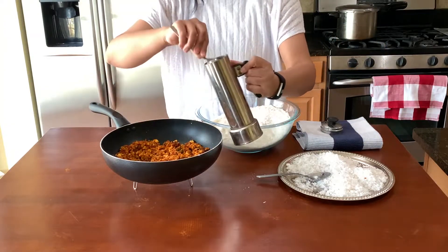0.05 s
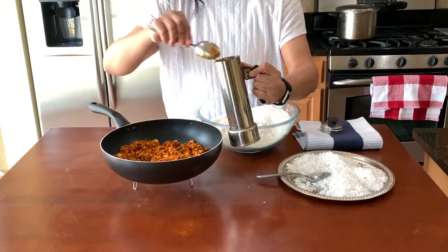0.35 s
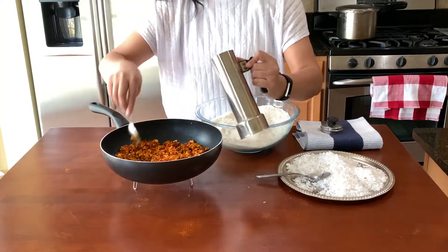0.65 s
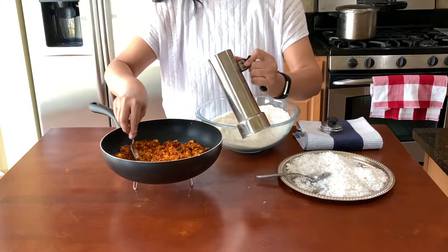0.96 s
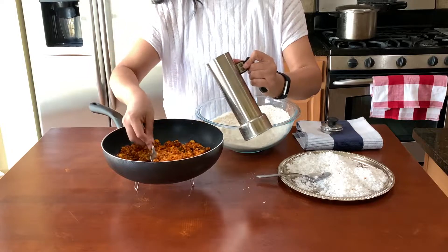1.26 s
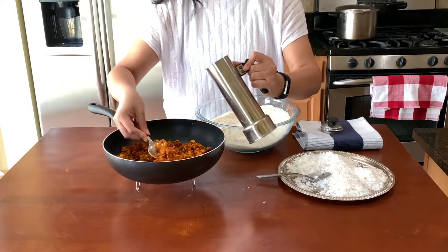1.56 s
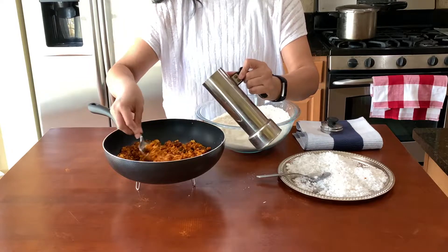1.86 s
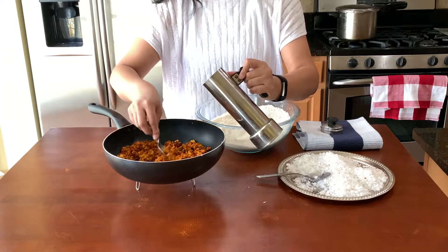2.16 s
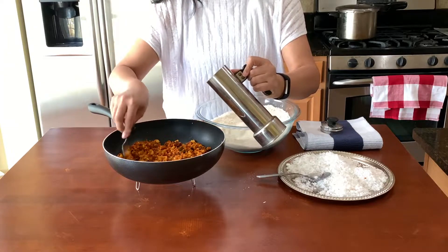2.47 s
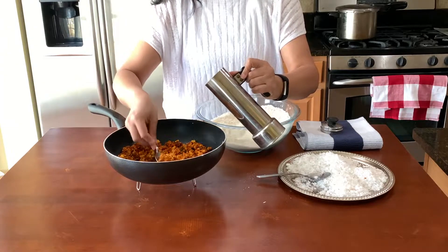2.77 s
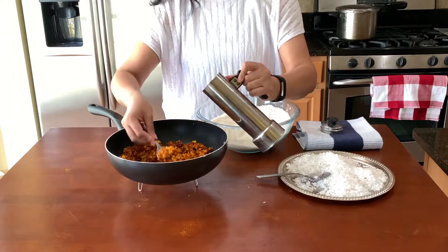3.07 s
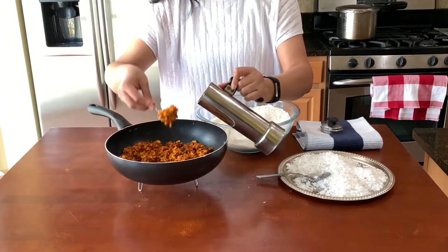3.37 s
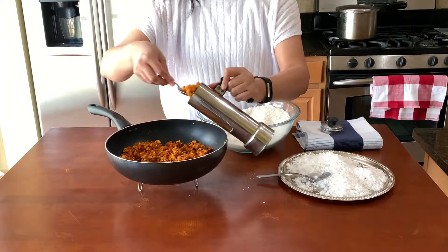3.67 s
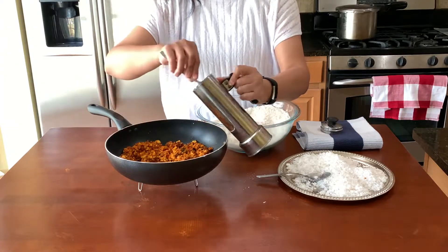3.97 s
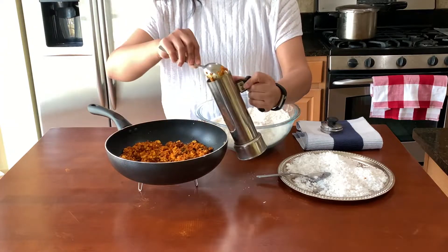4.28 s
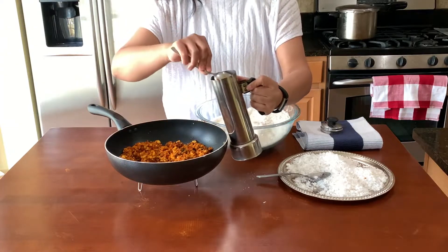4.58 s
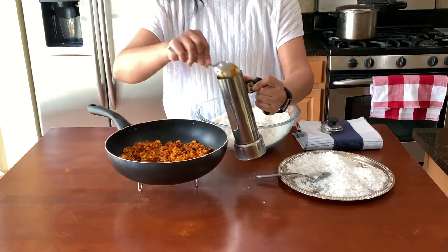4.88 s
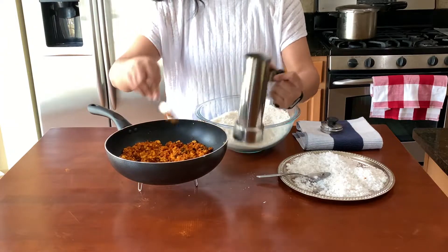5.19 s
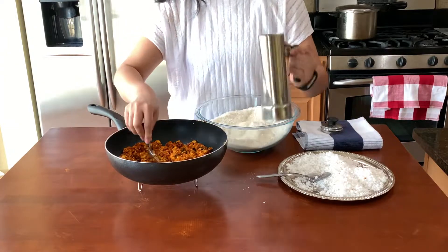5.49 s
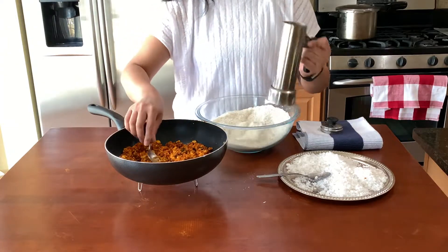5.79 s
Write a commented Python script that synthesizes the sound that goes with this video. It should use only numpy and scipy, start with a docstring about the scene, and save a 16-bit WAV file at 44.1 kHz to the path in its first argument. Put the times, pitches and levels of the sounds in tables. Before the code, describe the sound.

A steel spoon clinks lightly on a steel tube, then knocks and briefly scrapes in a frying pan, scooping moist filling with faint sticky crackles. After a pan knock that thumps the wooden table, a quick run of sharp clinks and a tiny squeal come from the tube's rim. One more loud pan knock follows. The sounds are near, in a small, hard-walled kitchen with a low rumble and faint hiss.

```python
"""Spoon, steel tube and frying pan

A steel spoon scoops moist filling from a frying pan and knocks it off into a hand-held steel tube. It clinks
and squeals on the tube's rim, knocks and scrapes in the pan, and the food crackles softly. Once the tube's base
knocks against the pan. Hard blows thump the table. A small hard kitchen rings after each, over a low rumble and
a faint hiss."""
import sys
import numpy as np
from scipy import signal
from scipy.fft import rfft, irfft
from scipy.io import wavfile

SR = 44100
rng = np.random.default_rng(int(sys.argv[2]) if len(sys.argv) > 2 else 0)


def digitize_waveform(pressure):
    """Quantize a signal to 16-bit integers and store it at the path in sys.argv[1].

    Rows of a 2-D input are taken as channels; values are limited to [-1, 1].
    """
    field = np.atleast_2d(pressure).T
    bounded = np.clip(field, -1, 1)
    quanta = np.round(bounded * 32767).astype(np.int16)
    wavfile.write(sys.argv[1], SR, quanta)


N = 266364
T = np.arange(N) / SR
RING_T = T[:SR]

# Each row: start in seconds, level in dB, thud below 950 Hz in dB, brightness above 4200 Hz in dB,
# pitch favoured by the struck spot in Hz, its lift in dB, spoon ring relative to the vessel in dB.
RIM_CLINKS = [(.3595, -22.5, 8.5, 4, 604, 2.5, -6.5), (3.8108, -25.5, 2.5, -2, 885, 8, -10),
              (4.6630, -10, -15.5, -0.5, 1635, 15.5, -11.5), (4.7260, -29, 8, 4.5, 9300, 8, -15),
              (4.8188, 0.5, -9, -4.5, 1950, 7, -30.5), (4.8272, -18.5, -7, 1.5, 2760, 12, -19),
              (4.9158, -17, -10.5, 4, 3040, 9.5, -20)]
# Each row: frequency in Hz, relative energy in dB, t60 in seconds.
TUBE_MODES = [(461.3, -7, 0.017), (621, -5.5, 0.052), (881, -11.5, 0.051), (1056, -8.5, 0.085),
              (1364, -7.5, 0.027), (1748, -13, 0.049), (1805, -2, 0.025), (1823, -15, 0.33),
              (1980, -16, .06), (2420, -11, 0.03), (2604, -6.5, 0.049), (2750, -3, 0.041),
              (3084, -18.5, 0.13), (3890, -8, 0.056), (4040, -23, 0.081), (5150, -19.5, 0.07),
              (4920, -17, 0.068), (6930, -12, 0.027), (6560, -30.5, 0.16), (7340, -28.5, 0.095),
              (9100, -23.5, 0.03)]
# Spectrum of the many short-lived overtones. Each row: frequency in Hz, relative density in dB.
TUBE_CRACK = [(100, -38), (250, -11), (500, 1.5), (1500, -2.5), (3000, -5.5), (5500, -13.5), (9500, -8.5),
              (14000, -18.5), (17000, -31.5)]


def tube_clinks():
    """The spoon strikes the rim of the hand-damped steel tube; returns (rings, cracks)."""
    return undb(6.5) * blows(RIM_CLINKS, TUBE_MODES, TUBE_CRACK, crack_db=-3.5, crack_t60=0.02,
                             tick_db=-16.5, linger_db=-14.5, linger_t60=0.27)


# Columns as in RIM_CLINKS, TUBE_MODES and TUBE_CRACK, in that order.
PAN_KNOCKS = [(.9868, -26.5, 8, -17, 1880, 9, -30), (1.1270, -14.5, -6.5, -5, 1100, 8, -30),
              (1.186, -21, 1, -24, 1020, 20, -33), (1.5174, -47.5, -17, 8, 4760, 17, -10),
              (2.6272, -5.5, -6.5, -7.5, 3270, 6.2, -16), (3.0600, -17, -5.5, -16, 2430, 5.1, -11.5),
              (4.5258, -12, 6, -1, 809.3, 10, -23), (5.6160, -39.5, 10, 6, 1105, 3, -22.5),
              (5.6442, 1, -4.5, -2, 1210, 5.2, -27.5)]
PAN_MODES = [(157, -1.5, 0.37), (229.7, 6.5, 0.35), (291.5, -2, .2), (381, -4, 0.17), (440, -9, 0.54),
             (644, -0.5, 0.43), (790, -10, 0.39), (986, -4.5, 0.51), (1189, 1, 0.041), (1274, -2, 0.2),
             (1515, -7, 0.33), (1820, -8, 0.31), (2080, -7, 0.2), (2190, -9, 0.32), (2525, -18, 0.45),
             (2625, -17.5, 0.1), (2960, -7, 0.18), (3357, -6, 0.2), (3650, -5.5, 0.07), (4080, -9, 0.22),
             (4640, -10.5, 0.12), (6920, -16.5, .12), (8100, -17.5, .14), (9200, -31, .1)]
PAN_CRACK = [(60, 16), (200, 11), (1200, 6), (3500, -0.5), (5500, -7.5), (9000, -10), (12000, -38),
             (16000, -38)]


def pan_knocks():
    """The spoon, or once the tube's base, knocks the frying pan, which rings lower and longer; returns (rings,
    cracks)."""
    return undb(0.5) * blows(PAN_KNOCKS, PAN_MODES, PAN_CRACK, crack_db=-1, crack_t60=0.051,
                             tick_db=-16, linger_db=-2, linger_t60=0.37)


# Each row: frequency in Hz, relative energy in dB, t60 in seconds.
SPOON_MODES = [(858, -0.5, 0.14), (1327, 0, 0.069), (2558, 6.5, 0.28), (3200, -8, 0.052), (3957, -6, 0.45),
               (6925, -4.5, 0.21), (9940, -10.5, .15), (11100, -14, 0.15)]


def blows(hits, modes, crack_spectrum, crack_db, crack_t60, tick_db, linger_db, linger_t60):
    """Each blow rings both vessel and spoon and gives a short crack with a hard tick."""
    rings, cracks = np.zeros((2, N))
    for start, db, *touch, spoon_db in hits:
        vessel = chime(modes, linger_db, linger_t60)
        spoon = chime(SPOON_MODES, linger_db, linger_t60)
        crack = unit(colour(rng.standard_normal(SR), crack_spectrum) * fade(crack_t60))
        tick = unit(np.diff(colour(rng.standard_normal(SR + 1), crack_spectrum)) * fade(.011))
        add(rings, start, undb(db) * contact(unit(vessel + undb(spoon_db) * spoon), *touch))
        add(cracks, start, undb(db) * contact(undb(crack_db) * crack + undb(tick_db) * tick, *touch))
    return np.array([rings, cracks])


def chime(modes, linger_db, linger_t60):
    """Struck metal is soon damped, but the walls keep its pitch a while longer."""
    t = RING_T[:SR // 2]
    knots_s = np.arange(0, .55, 1 / 55)
    linger = undb(linger_db) * unit(fade(linger_t60))[:len(t)]
    ring = np.zeros(SR)
    for k, (hz, db, t60) in enumerate(modes):
        phase = 2 * np.pi * hz * t
        direct = unit(fade(t60)[:len(t)]) * np.sin(phase)
        # Echoes from many walls waver in level and phase.
        waver, drift = rng.standard_normal((2, len(knots_s)))
        echo = np.interp(t, knots_s, undb(3 * waver)) * np.cos(phase + np.interp(t, knots_s, .9 * drift))
        ring[:len(t)] += (-1) ** k * undb(db + rng.standard_normal()) * (direct + linger * echo)
    return unit(ring)


def contact(x, thud_db, bright_db, spot_hz, spot_db):
    """The weight, hardness and spot of a blow filter its sound."""
    hz = bins(x)
    db = thud_db / (1 + (hz / 950) ** 4) + bright_db / (1 + (4200 / hz) ** 4)
    db += spot_db * np.exp(-.5 * (np.log2(hz / spot_hz) / .16) ** 2)
    # Minimum phase: nothing sounds ahead of the blow.
    cepstrum = irfft(np.log(undb(db)), len(x))
    cepstrum[1:len(x) // 2] *= 2
    cepstrum[len(x) // 2 + 1:] = 0
    return irfft(rfft(x) * np.exp(rfft(cepstrum)), len(x))


def rim_slide():
    """The spoon squeals up in pitch as it slides on the rim; an overtone and hiss mark one catch."""
    start_s, end_s = 4.668, 4.811
    start_hz, rise_hz_per_s = 1508, 2900
    start_db, fade_db_per_s = -42, 160
    age = np.clip(T - start_s, 0, end_s - start_s)
    phase = 2 * np.pi * np.cumsum(start_hz + rise_hz_per_s * age) / SR
    grip = signal.sosfilt(signal.butter(2, 90, fs=SR, output="sos"), rng.standard_normal((2, N)))
    squeal = steady(grip[0] * np.sin(phase) + grip[1] * np.cos(phase))
    overtone = steady(resonate(rng.standard_normal(N), hz=3085, width_hz=25))
    hiss = steady(resonate(rng.standard_normal(N), hz=9600, width_hz=4980))
    drag = (T > start_s) * (T < end_s) * undb(start_db - fade_db_per_s * age)
    catch = swell(peak_s=4.748, half_s=.014, db=-49)
    return drag * squeal + catch * (overtone + undb(-5.5) * hiss)


# Each row: first touch, full pressure and release in seconds, level in dB, easing in dB per second,
# relative level of the spoon's edge in dB.
SCRAPE_STROKES = [(0.99, 1.115, 1.144, -33, 175, -19.5), (2.627, 2.626, 2.714, -32.5, 400, -8)]
# Pan under the spoon, then the spoon's edge. Each row: frequency in Hz, width in Hz, gain in dB.
PRESSED_PAN_MODES = [(491, 57, -1), (673, 48, -3), (788, 120, -5), (928, 150, 2.5), (1031, 62, 5.5),
                     (1113, 35.5, 6.5), (1588, 60, -5), (1835, 49, -1.5), (2000, 160, -12.5),
                     (2164, 146, -4.5)]
SPOON_EDGE_MODES = [(2896, 92, 3), (3040, 103, 5), (3740, 210, -2), (4130, 120, -1.5), (5200, 590, -14),
                    (7280, 800, -11.5)]
# Each row: frequency in Hz, relative density in dB.
GRIT_SPECTRUM = [(80, -3), (300, -9), (1000, 5), (2000, 16), (4000, -11), (6000, -4), (9000, -11.5),
                 (12000, -17.5), (16000, -59)]


def scraping():
    """The spoon's edge sticks and slips over the pan floor."""
    out = np.zeros(N)
    grease = signal.butter(2, 8500, fs=SR, output="sos")  # rounds every slip
    for *stroke, edge_db in SCRAPE_STROKES:
        push = pressure(*stroke)
        slips = signal.sosfilt(grease, clicks(per_s=1600, spread_db=1.0) * push)
        pan = steady(resonate_modes(slips, PRESSED_PAN_MODES))
        edge = steady(resonate_modes(slips, SPOON_EDGE_MODES))
        grit = steady(colour(slips, GRIT_SPECTRUM))
        out += np.std(push) * (undb(-3.5) * pan + undb(edge_db) * edge + undb(-11.5) * grit)
    return out


def pressure(touch_s, full_s, release_s, db, ease_db_per_s):
    """Gain of one stroke: the spoon touches, leans in, holds and eases off."""
    touch_db = -15
    lean = np.clip((T - touch_s) / max(full_s - touch_s, 1 / SR), 0, 1) ** 1.37
    eased_db = ease_db_per_s * np.maximum(T - release_s, 0)
    return (T >= touch_s) * undb(db + touch_db * (1 - lean) - eased_db)


# Each row: start in seconds, level in dB.
TABLE_THUMPS = [(2.628, -6), (4.526, 0), (5.644, -17)]
# Each row: frequency in Hz, relative energy in dB, t60 in seconds.
TABLE_MODES = [(34.5, -4, 0.55), (112.5, -15.5, .4), (440, -10.5, 0.25)]


def table_thumps():
    """Hard blows on the pan thump the wooden table under it."""
    out = np.zeros(N)
    thump = sum(undb(db) * unit(np.sin(2 * np.pi * hz * RING_T) * fade(t60))
                for hz, db, t60 in TABLE_MODES)
    for start, db in TABLE_THUMPS:
        add(out, start, undb(db) * thump)
    return out


# Each row: peak and half length in seconds, level in dB, hollow's pitch in Hz, its relative level in dB.
FOOD_HEAPS = [(1.115, 0.037, -50.5, 488, -5), (1.367, 0.042, -46.5, 282, 1.5), (2.691, 0.02, -42, 515, -15),
              (2.96, 0.077, -50.5, 433, -14)]
# Each row: frequency in Hz, relative density in dB.
RUB_SPECTRUM = [(60, -3), (150, -8.5), (290, -9), (480, -12), (1000, -14), (1500, -28.5), (4000, -35.5),
                (16000, -56)]


def food_rubbing():
    """Shoved heaps of soft food rub dully along the pan and sound the hollow under the spoon."""
    out = np.zeros(N)
    for peak_s, half_s, db, hollow_hz, hollow_db in FOOD_HEAPS:
        crumbs = steady(colour(clicks(per_s=1200, spread_db=1.5), RUB_SPECTRUM))
        hollow = steady(resonate(crumbs, hollow_hz, width_hz=21))
        out += swell(peak_s, half_s, db) * steady(crumbs + undb(hollow_db) * hollow)
    return out


# Each row: start in seconds, level in dB, pitch in Hz.
STICKY_POPS = [(.8766, -40, 2580), (0.9609, -40.5, 3230), (1.3, -46, 6500), (2.282, -41, 8900),
               (2.3081, -38.5, 4080), (2.873, -38.5, 5900), (3.1155, -41, 6000), (5.317, -39, 8800),
               (5.4628, -42, 6160)]
# Each row: peak and half length in seconds, level in dB.
FOOD_SQUISHES = [(1.255, 0.15, -75.5), (1.547, .03, -76), (2.317, 0.033, -81), (3.0, 0.14, -77.5),
                 (5.343, .075, -73), (5.872, 0.011, -61), (6.01, 0.058, -69.5)]
# Each row: frequency in Hz, relative density in dB.
CRACKLE_SPECTRUM = [(200, -6), (1000, 10), (3000, 5.5), (7000, -1), (10000, -1), (15000, -24.5)]


def food_crackle():
    """Sticky food pops as it leaves the spoon; moist grains crackle as they shift and part."""
    pops = np.zeros(N)
    for start, db, hz in STICKY_POPS:
        burst = rng.standard_normal(SR) * fade(.004)
        add(pops, start, undb(db) * unit(resonate(burst, hz, hz / 2)))
    stirring = undb(-84) + sum(swell(*squish) for squish in FOOD_SQUISHES)
    crackle = steady(colour(clicks(per_s=130, spread_db=1.5), CRACKLE_SPECTRUM))
    small_pops = steady(resonate(clicks(per_s=22, spread_db=0), hz=7200, width_hz=3600))
    return pops + stirring * (crackle + undb(-6) * small_pops)


# Each row: band centre in Hz, t60 in seconds, level in dB.
REVERB_BANDS = [(125, 0.94, -7.5), (500, 0.52, -1), (1520, 0.45, -2), (3940, 0.44, -6.5), (8000, 0.32, -5),
                (14000, .28, -15)]


def kitchen(x):
    """A diffuse tail builds up after the first wall and dies sooner in the treble."""
    centres_hz, t60s, levels_db = np.transpose(REVERB_BANDS)
    noise = rfft(rng.standard_normal(SR))
    build_up = np.clip((RING_T - .003) / 0.0067, 0, 1)
    tail = np.zeros(SR)
    for selector, t60, db in zip(np.eye(len(centres_hz)), t60s, levels_db):
        band_gain = np.interp(np.log(bins(RING_T)), np.log(centres_hz), selector)
        tail += undb(db) * irfft(noise * band_gain, SR) * unit(fade(t60) * build_up)
    return signal.fftconvolve(x, tail)[:N]


# Each row: frequency in Hz, relative density in dB.
AIR_SPECTRUM = [(7.1, -11), (12, 8.5), (26, -11.5), (64, -17.5), (127, -27.5), (156, -26), (176, -31),
                (252, -31.5), (339, -34.5), (830, -40.5), (2500, -54.5), (2740, -53.5), (2990, -55),
                (13700, -61.5), (15000, -69.5)]


def background():
    """An even hiss over a deep rumble that grows near the end."""
    hiss_db = -67
    air = cut_treble(colour(rng.standard_normal(N), AIR_SPECTRUM), hz=14300)
    hiss = signal.sosfiltfilt(signal.butter(4, 200, "high", fs=SR, output="sos"), air)
    rumble = signal.sosfiltfilt(signal.butter(2, 45, fs=SR, output="sos"), air)
    return (air + swell(peak_s=6.24, half_s=0.65, db=10.5) * rumble) * undb(hiss_db) / np.std(hiss)


def undb(db):
    """Decibels to gain."""
    return 10 ** (np.asarray(db) / 20)


def unit(x):
    """Scale to an energy of one."""
    return x / np.sqrt(np.sum(x ** 2))


def steady(x):
    """Scale to an rms of one."""
    return x / np.std(x)


def add(out, start_s, x):
    """Mix x into out."""
    i = int(start_s * SR)
    out[i:i + len(x)] += x[:len(out) - i]


def fade(t60):
    """One second of exponential decay, 60 dB down at t60 seconds."""
    return np.exp(-np.log(1000) * RING_T / t60)


def swell(peak_s, half_s, db):
    """Bell-shaped gain over time."""
    return undb(db) * np.exp(-.5 * ((T - peak_s) / half_s) ** 2)


def clicks(per_s, spread_db):
    """Random tiny impacts of either sign."""
    size = undb(spread_db * np.minimum(rng.exponential(size=N), 4))
    return (rng.random(N) < per_s / SR) * size * rng.choice([-1, 1], N)


def bins(x):
    """Spectrum frequencies of x in Hz, at least 1."""
    return np.maximum(np.fft.rfftfreq(len(x), 1 / SR), 1)


def colour(x, points):
    """Shape x by (Hz, dB) points joined on a log-frequency axis."""
    hz, db = np.transpose(points)
    return irfft(rfft(x) * undb(np.interp(np.log(bins(x)), np.log(hz), db)), len(x))


def resonate(x, hz, width_hz):
    """Two-pole resonance, gain one at its centre."""
    return signal.lfilter(*signal.iirpeak(hz, hz / width_hz, fs=SR), x)


def resonate_modes(x, modes):
    """Parallel resonances of alternating sign."""
    return sum((-1) ** k * undb(db) * resonate(x, hz, width) for k, (hz, width, db) in enumerate(modes))


def cut_treble(x, hz):
    """Steep low-pass."""
    return signal.sosfilt(signal.ellip(8, .2, 70, hz, fs=SR, output="sos"), x)


def scene():
    """Clinks, knocks, scrapes and food in the kitchen, in mono."""
    rings, cracks = tube_clinks() + pan_knocks()
    noises = cracks + rim_slide() + scraping() + food_rubbing() + table_thumps() + food_crackle()
    reverb = kitchen(noises + undb(-7) * rings)
    return (rings + noises + reverb + background())[None]


def record(dry):
    """The treble ends at 15 kHz."""
    return cut_treble(dry, hz=15000)


dry = scene()
out = record(dry)
digitize_waveform(out)
```